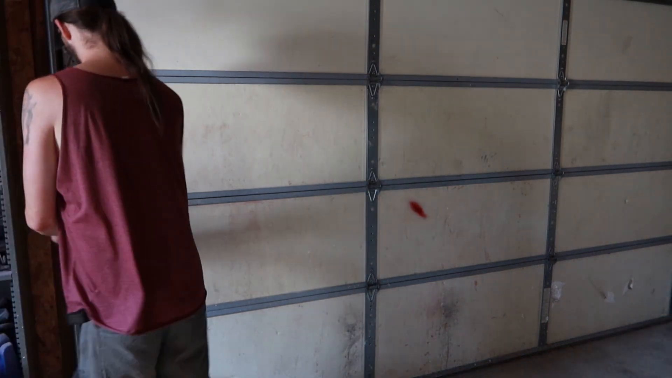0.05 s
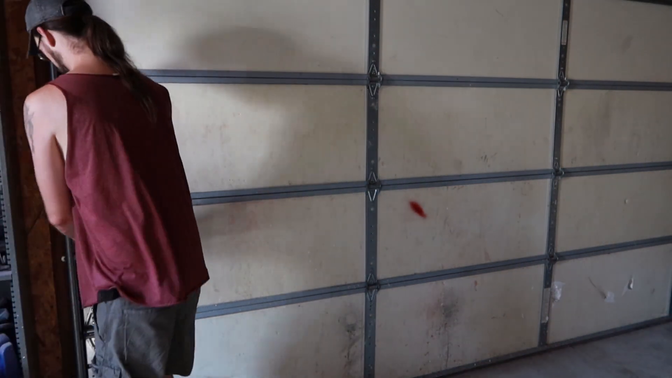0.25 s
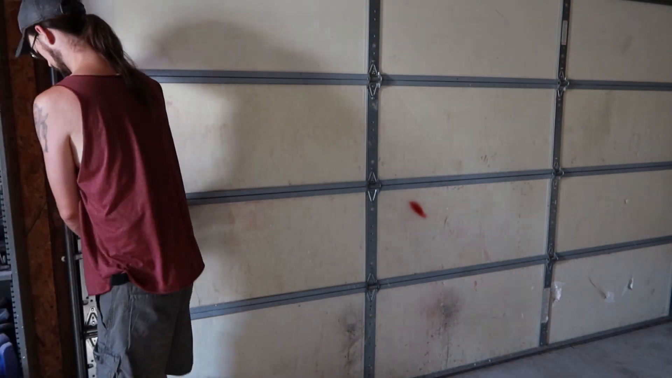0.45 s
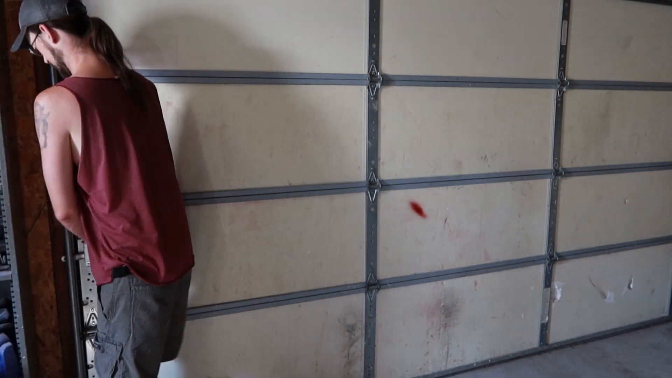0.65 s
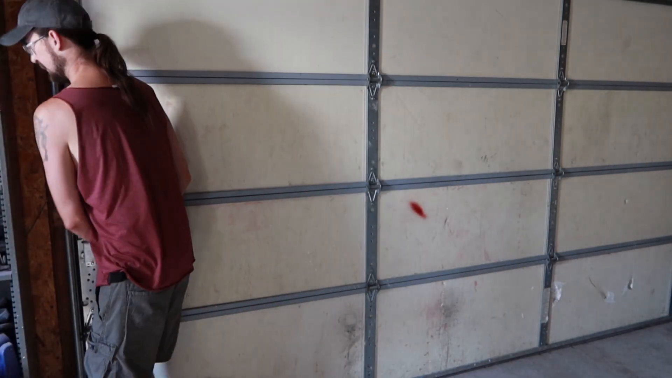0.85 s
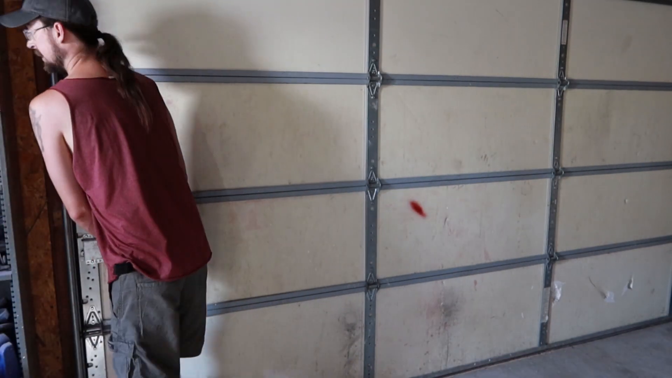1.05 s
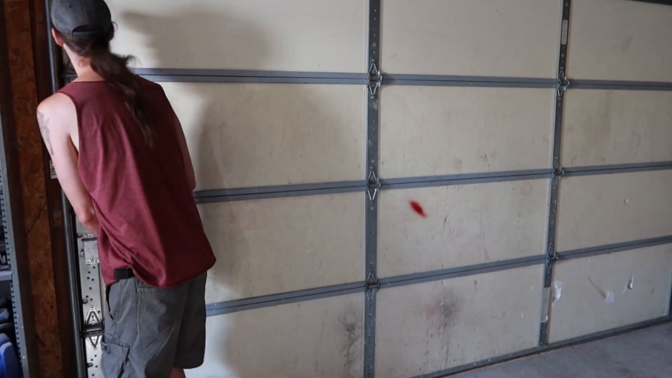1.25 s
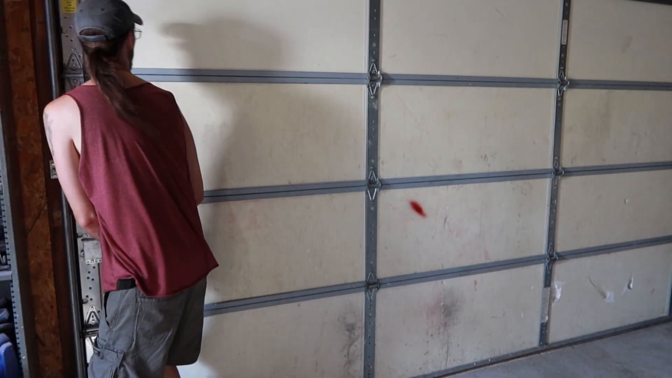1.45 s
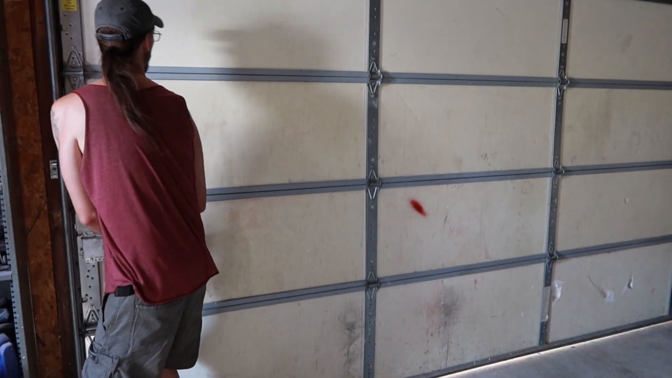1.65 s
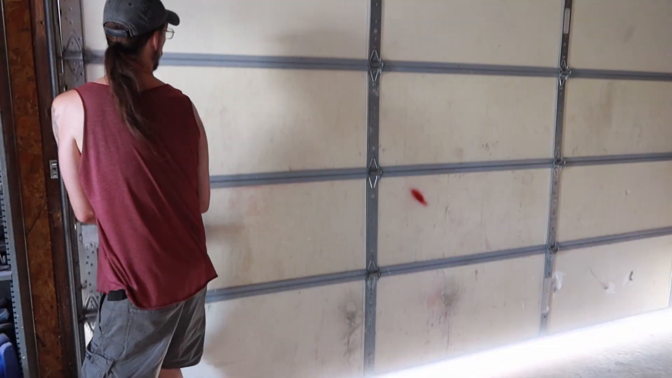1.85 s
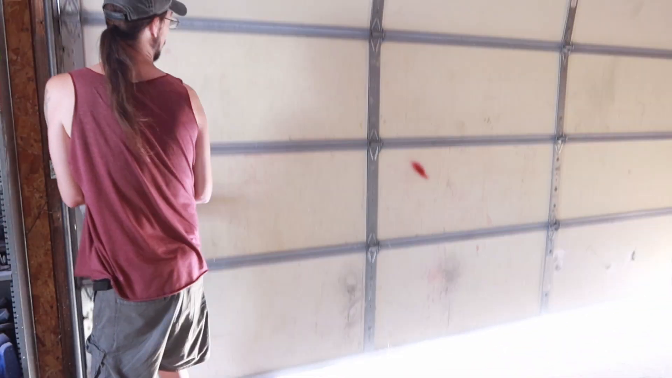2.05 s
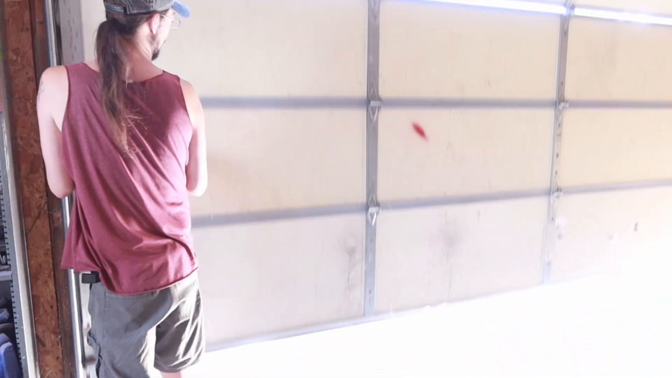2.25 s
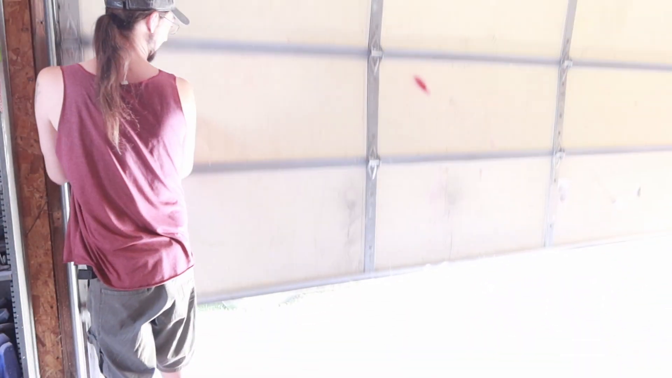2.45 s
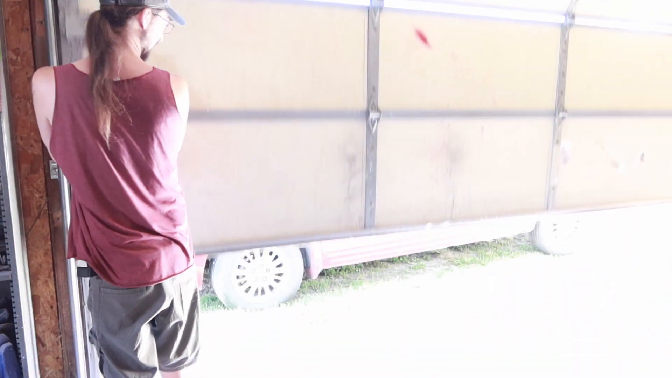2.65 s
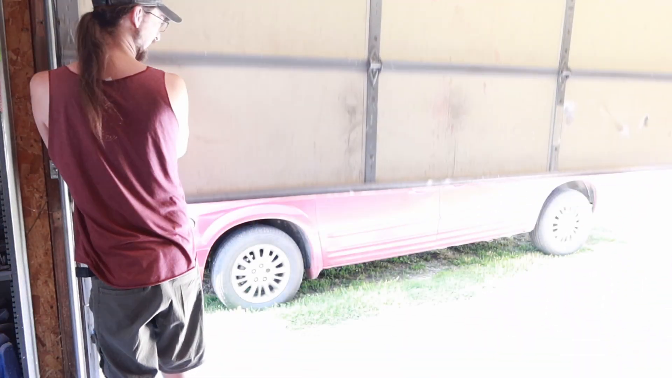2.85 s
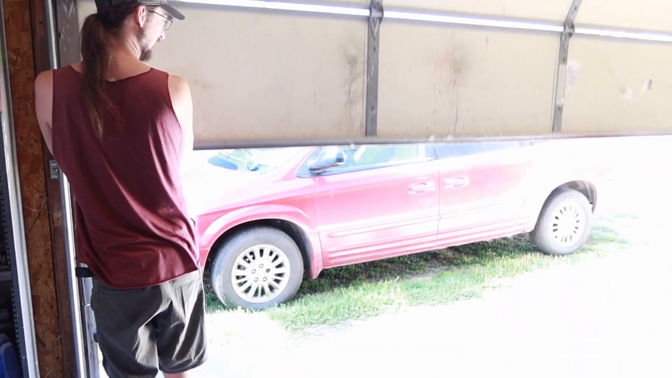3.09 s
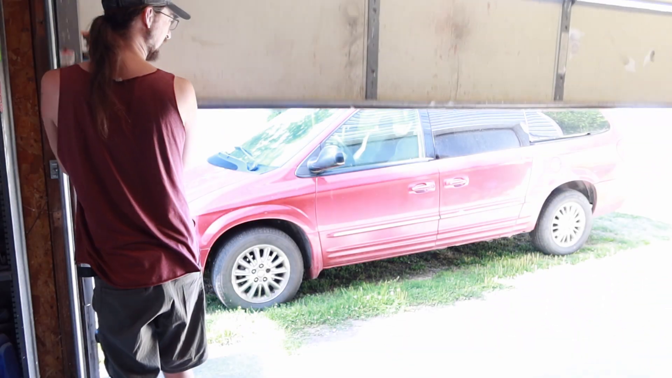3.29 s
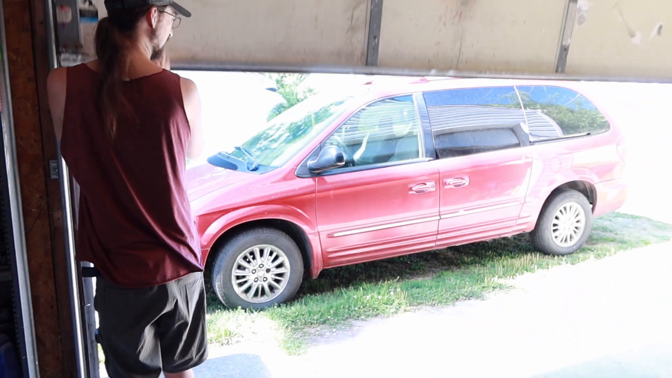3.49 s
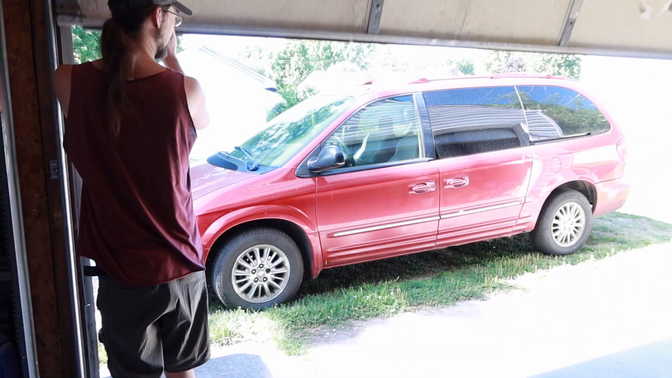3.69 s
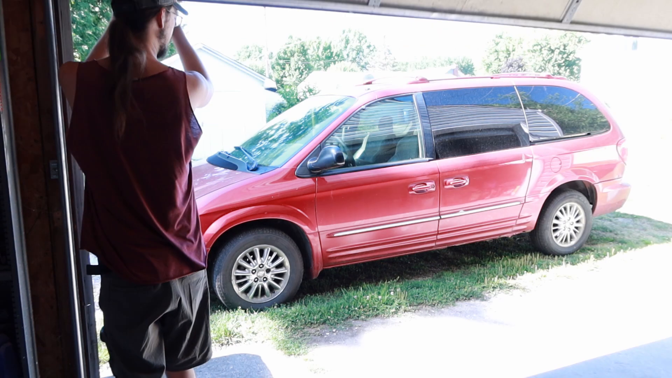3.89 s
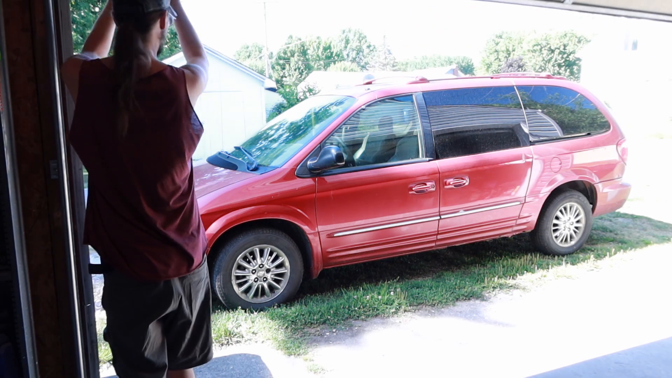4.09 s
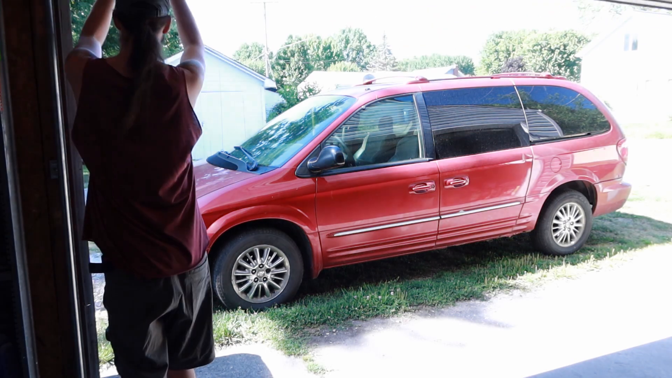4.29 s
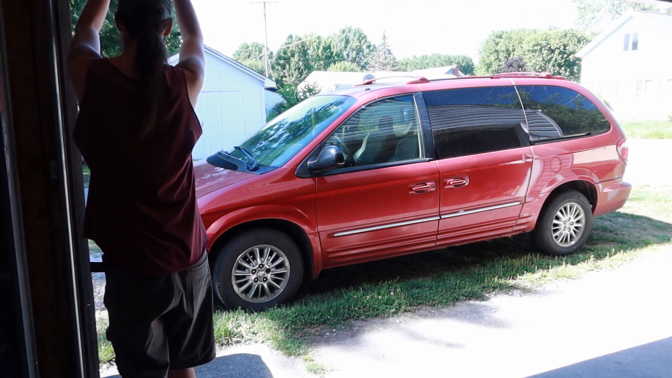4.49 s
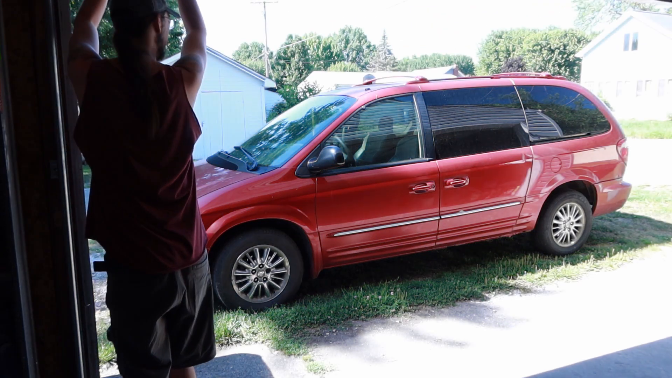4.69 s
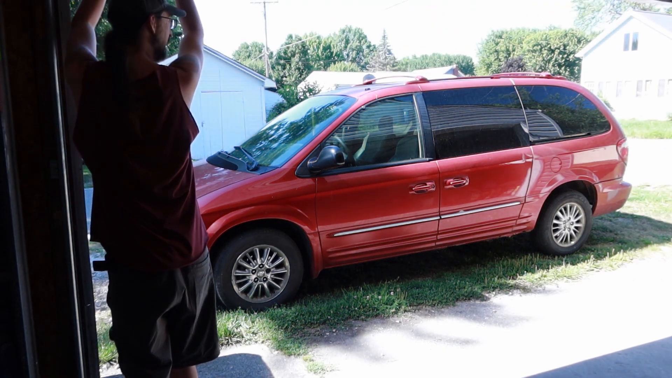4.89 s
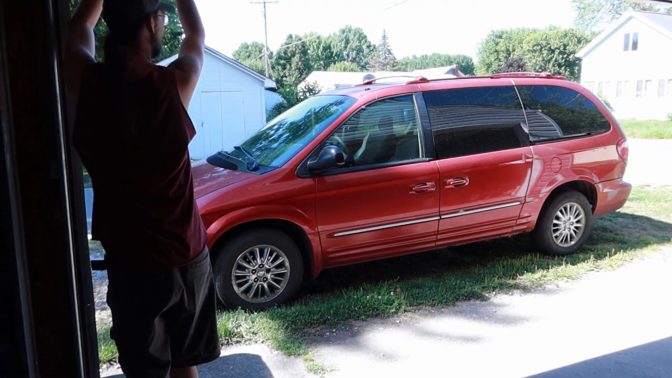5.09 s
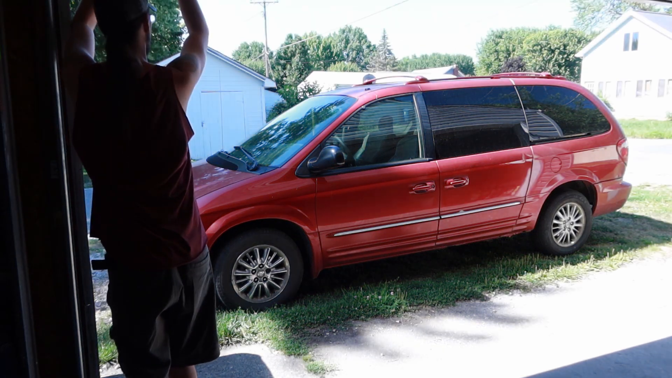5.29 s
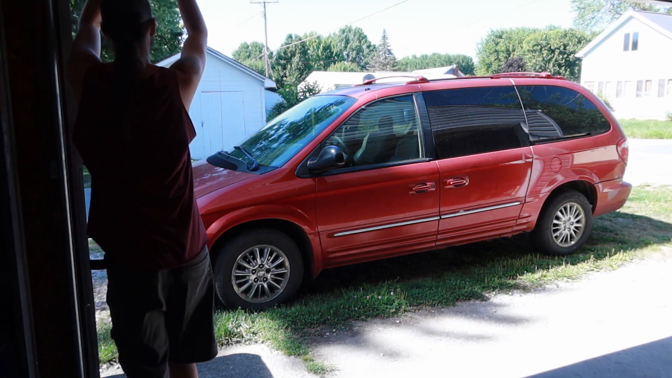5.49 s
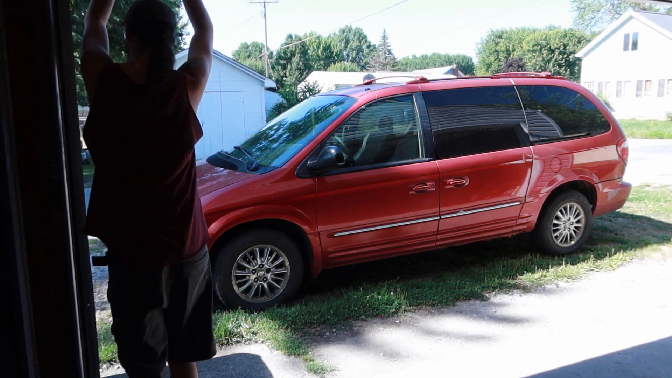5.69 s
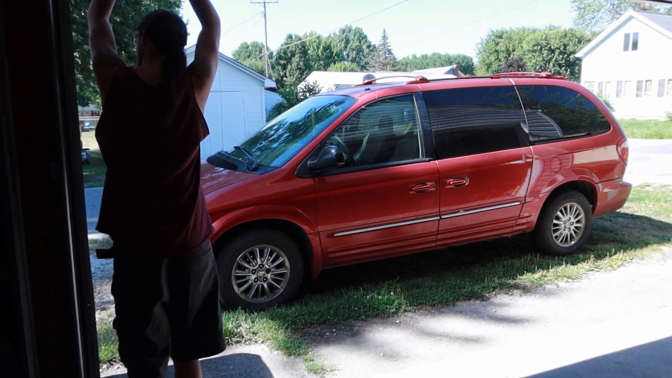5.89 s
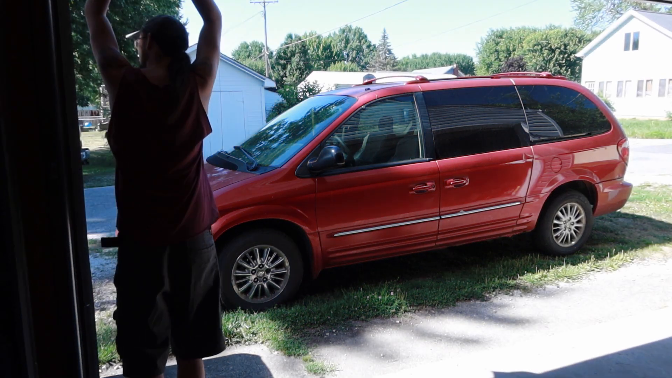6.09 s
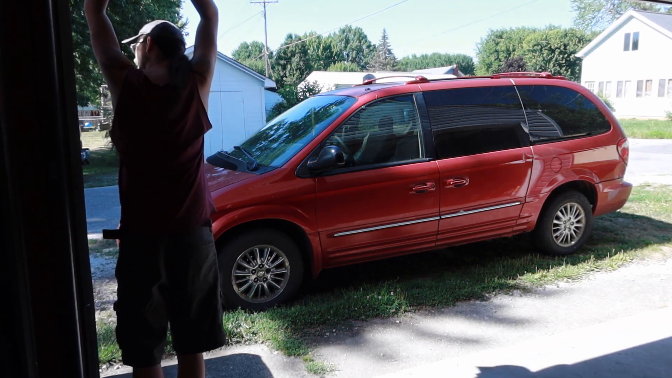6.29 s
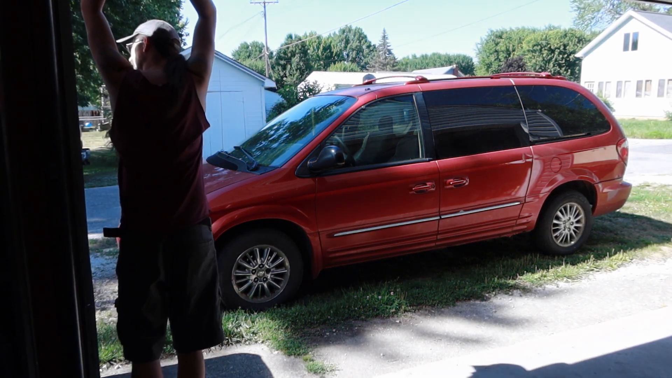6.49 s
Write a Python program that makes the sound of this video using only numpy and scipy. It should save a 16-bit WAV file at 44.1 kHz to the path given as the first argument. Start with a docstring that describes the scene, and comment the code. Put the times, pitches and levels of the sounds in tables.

```python
"""A sectional steel garage door is unlatched, heaved up by hand and rolls along its tracks to rest overhead.
Each contact force excites three resonant bodies: the wide leaf (thud), tracks and hinges (clatter) and
small steel parts (clink). The lock bar rings, hinges creak by stick-slip, and loose rollers rattle, tick
and squeal as decaying modes, noise bursts and gliding tones. The bare garage reverberates; outdoor air
sounds throughout and a bird calls once the door stands open."""
import sys
import numpy as np
from scipy import signal
from scipy.fft import rfft, irfft
from scipy.io import wavfile

SR = 44100
rng = np.random.default_rng(int(sys.argv[2]) if len(sys.argv) > 2 else 0)


def unload_audio(sound):
    """Save the sound as a 16-bit wav file, at the path given as the first command line argument."""
    columns = np.transpose(np.atleast_2d(sound))
    # keep every value between -1 and 1, then stretch to whole-number steps
    steps = np.round(np.clip(columns, -1, 1) * 32767)
    wavfile.write(sys.argv[1], SR, steps.astype(np.int16))


N = 288752
T = np.arange(N) / SR
# scales a blow of energy one: its level is that energy spread over 40 ms
BLOW = np.sqrt(0.04 * SR)


def undb(db):
    """Logarithmic level: decibels become an amplitude gain."""
    return 10 ** (np.asarray(db) / 20)


def unit(x):
    """Energy normalization: the squares sum to one."""
    return x / np.sqrt(np.sum(x ** 2) + 1e-18)


def unit_rms(x):
    """Power normalization: a signal of length N gets an rms of one."""
    return np.sqrt(N) * unit(x)


def at_hz(points, hz):
    """Logarithmic frequency scale: interpolate a table of values over it."""
    table_hz, value = np.transpose(points)
    return np.interp(np.log(hz + 1e-3), np.log(table_hz), value)


def colour(x, points):
    """Linear filtering: weight the spectrum by a table of frequency and dB."""
    gain = undb(at_hz(points, np.fft.rfftfreq(x.shape[-1], 1 / SR)))
    return irfft(rfft(x) * gain, x.shape[-1])


def causal(points, size=4096):
    """Minimum phase: folding the cepstrum gives the most compact causal ring with this spectrum."""
    gain = undb(at_hz(points, np.fft.rfftfreq(size, 1 / SR)))
    cepstrum = irfft(np.log(gain))
    cepstrum[1:size // 2] *= 2
    cepstrum[size // 2 + 1:] = 0
    return irfft(np.exp(rfft(cepstrum)))


def play(force, response):
    """Superposition: convolve a force with a response of one or two channels."""
    return signal.fftconvolve(force[None], response, axes=1)[:, :N]


def add_at(out, start_s, sound):
    """Superposition: add a sound at its start time."""
    i = int(start_s * SR)
    out[..., i:i + sound.shape[-1]] += sound


def walk(rate):
    """Random modulation: join Gaussian knots, rate per second; after 1024 knots the last value holds."""
    knots = rng.standard_normal(1024)
    return np.interp(T * rate, np.arange(len(knots)), knots)


def progress_of(start_s, length_s):
    """Event time: a ramp from 0 to 1 over the event, constant outside it."""
    return np.clip((T - start_s) / length_s, 0, 1)


def drag_swell(start_s, length_s):
    """Drag envelope: the root of a half sine, steep at both ends."""
    return np.sqrt(np.abs(np.sin(np.pi * progress_of(start_s, length_s))))


def contacts(rate, scatter_db):
    """Shot noise: sparse random impacts of either sign and uneven size, rms one; rate per second."""
    chance, size, sign = rng.random(N), rng.standard_normal(N), rng.choice([-1, 1], N)
    return unit_rms((chance < rate / SR) * sign * undb(scatter_db * np.clip(size, -2, 2)))


def by_hardness(soft_hard_db, hardness):
    """Contact stiffness: interpolate in dB between a soft and a hard contact."""
    return undb(np.interp(hardness, (0, 1), soft_hard_db))


def ring(modes):
    """Modal synthesis: sum decaying sines with random signs, total energy one, over one second."""
    t, total = T[:SR], 0
    for hz, db, t60_s in modes:
        tone = unit(np.sin(2 * np.pi * hz * t) * undb(-60 * t / t60_s))
        total = total + undb(db) * rng.choice([-1, 1]) * tone
    return unit(total)


def spread(mid, other, width):
    """Mid-side stereo: a diffuse part enters the two ports with opposite sign, its level set by frequency."""
    return mid + np.array([[1], [-1]]) * colour(other, width)


# reverberation time of the garage: hz [Hz], t60_s [s]
GARAGE_T60 = [(100, 0.6), (300, 0.63), (800, 0.65), (2000, 0.54), (5000, 0.52), (9000, 0.44),
              (15000, 0.042)]
# decorrelation of reflected sound between the ports: hz [Hz], side_db [dB]
PORT_WIDTH = [(60, -99), (200, -76), (420, -25), (700, -36), (1000, -31), (1500, -18), (2300, -14.5),
              (4500, -7.5), (8000, -4.5), (15000, -23.5)]


def garage():
    """Diffuse reverberation: one second of noise in which each frequency band decays at its own rate."""
    hz, s, cells = signal.stft(rng.standard_normal((2, SR)), SR, nperseg=256)
    fade = undb(-60 * s / at_hz(GARAGE_T60, hz)[:, None])
    mid, other = signal.istft(cells * fade, SR)[1][:, :SR]
    return spread(unit(mid), unit(other), PORT_WIDTH)


def shake(force, points, modes, crack_t60, crack_db, modes_db, direct_db=-11, count=6):
    """Structural response: the contact wanders between places, each with its own crack, modes and echoes."""
    stay = SR // 50  # samples at one place
    place = np.repeat(rng.integers(count, size=N // stay + 1), stay)[:N]
    body, out = causal(points)[None], 0
    direct = undb(direct_db) * signal.unit_impulse(SR)
    for k in range(count):
        crack = unit(rng.standard_normal(SR) * undb(-60 * T[:SR] / crack_t60))
        source = direct + undb(crack_db) * crack + garage()
        dense = signal.fftconvolve(source, body, axes=1)[:, :SR]
        response = np.sqrt(2) * unit(dense) + undb(modes_db) * ring(modes)
        out = out + play(force * (place == k), response)
    return out


# spectrum of the outdoor air: hz [Hz], density_db [dB per Hz]
AIR_COLOUR = [(20, -23), (70, -14), (160, -20), (400, -13), (1500, -23.5), (4000, -28), (7000, -34),
              (10000, -41.5), (15000, -65)]
# outdoor air reaches the ports from all around: hz [Hz], side_db [dB]
AIR_WIDTH = [(50, -23), (110, -8), (200, 1), (700, -2), (2000, 0), (6000, -7), (15000, 6)]


def outdoor_air(air_db=-56):
    """Broadband ambient noise: coloured random pressure whose level drifts slowly."""
    mid, other = (unit_rms(colour(rng.standard_normal(N), AIR_COLOUR)) for _ in range(2))
    return spread(mid, other, AIR_WIDTH) * undb(air_db + 2 * walk(1.6))


STRAIN_PEAK_S, STRAIN_DB, STRAIN_RISE_DB_PER_S, STRAIN_FADE_DB_PER_S = 2.77, -40, 5.5, 3


def strain():
    """Slow loading: the strain gain grows exponentially up to its peak in the lift, then dies away."""
    rise = STRAIN_RISE_DB_PER_S * (STRAIN_PEAK_S - T)
    fade = STRAIN_FADE_DB_PER_S * (T - STRAIN_PEAK_S)
    return undb(STRAIN_DB - np.maximum(rise, fade))


# dense resonances of the flexing door, its panels, the tracks and the small parts:
# hz [Hz], density_db [dB per Hz]
FLEX_COLOUR = [(15, -33), (30, -1), (48, 2), (62, -2.5), (80, 2.5), (105, -6), (135, 3.5), (180, -7.5),
               (260, -5.5), (350, -10.5), (700, -44)]
PANEL_COLOUR = [(15, -32), (30, -8), (48, -9), (62, -10), (80, -7), (125, -3), (160, -2.5), (240, -2.5),
                (330, -6.5), (700, -29.5)]
TRACK_COLOUR = [(110, -42), (200, -8.5), (290, 0.5), (450, 2.5), (680, 1), (950, 0.5), (1350, 0),
                (2100, -2.5), (2500, -8), (3300, -9.5), (6000, -26.5), (15000, -53)]
STEEL_COLOUR = [(600, -27.5), (1600, 0.5), (2700, 2.5), (3700, 1), (5000, -1.5), (6600, -1), (8200, -8),
                (10000, -7), (14000, -8.5), (16000, -36)]
# clear modes of the whole leaf, its panels, the tracks and the small parts:
# hz [Hz], level_db [dB], t60_s [s]
LEAF_MODES = [(75.9, 1, 1), (90.1, 2, 0.59), (114, -5, 0.23)]
PANEL_MODES = [(73, -7.5, 0.61), (99.5, 2, 0.25), (155.2, 5, 0.96), (190.2, 0, 0.19)]
TRACK_MODES = [(795, 1.5, 1), (1100, -9, 0.96), (1370, -4, 0.5), (1573, 5.5, 0.16), (1760, 4.5, 0.69),
               (2054, -4, 0.77), (2150, 0, 0.5)]
STEEL_MODES = [(2444, 5, 0.6), (2600, 6, 0.41), (2984, 7.5, 0.39), (3950, -1, 0.59), (4370, -8, 0.17),
               (4830, 7, 0.04), (4960, 1, 0.13), (5740, 2, 0.31), (5840, -12, 0.4), (5800, -19, 0.26),
               (5860, -23, 0.22), (6600, 3, 0.5), (6650, 1, 0.3)]
# fine hiss of the roller bearings: hz [Hz], level_db [dB relative to the rolling force on the tracks]
BEARING_HISS = [(3000, -64), (7000, -44), (9000, -12.5), (12000, -6), (14500, 1.5), (16000, -7)]
BOOM_DB = 1  # boom of the leaf modes, relative to the heave


def door():
    """Forced vibration: heaves and strain flex the leaf, rolling drums panels, tracks and small parts."""
    strain_load = strain()
    thuds, clanks, clinks = blows()
    leaf_load, panel_load = heaves()
    rumble, clatter, grit = rolling()

    bearings = colour(play(clatter, garage()), BEARING_HISS)
    # a sudden change of load makes the lowest modes boom
    boom = BLOW * undb(BOOM_DB) * play(np.gradient(leaf_load), ring(LEAF_MODES)[None])

    flex = leaf_load * contacts(rate=1300, scatter_db=2.5)
    flex += strain_load * contacts(rate=430, scatter_db=1.0)
    rumble = rumble + thuds + panel_load * contacts(rate=1500, scatter_db=1.5)
    rumble += strain_load * undb(-4.5) * contacts(rate=280, scatter_db=0.5)
    clatter = clatter + clanks + strain_load * undb(-5.0) * contacts(rate=110, scatter_db=13.5)
    grit = grit + clinks + strain_load * undb(-18.0) * contacts(rate=80, scatter_db=7)

    return (shake(flex, FLEX_COLOUR, LEAF_MODES, crack_t60=0.051, crack_db=1.5, modes_db=-6.5, count=2)
            + shake(rumble, PANEL_COLOUR, PANEL_MODES, crack_t60=0.082, crack_db=-2.5, modes_db=-5.5, count=4)
            + shake(clatter, TRACK_COLOUR, TRACK_MODES, crack_t60=0.042, crack_db=-3.0, modes_db=-14)
            + shake(grit, STEEL_COLOUR, STEEL_MODES, crack_t60=0.069, crack_db=-2.0, modes_db=-12)
            + boom + bearings)


# steel dragging on steel, the latch bar first and the settling door last:
# start_s [s], length_s [s], level_db [dB], hardness [0-1]
SCRAPES = [(0.028, 0.081, -37.5, 0.69), (0.114, .13, -52.5, 1), (0.67, 0.18, -41, 0.38),
           (1.063, 0.084, -20.5, 0.65), (1.155, 0.059, -29.5, 0.56), (1.48, 0.044, -36.5, 0.1),
           (1.701, 0.052, -35, 0.55), (1.835, 0.11, -31.5, 0.42), (1.942, 0.047, -22.5, 0.7),
           (3.21, 0.074, -25, 0.79), (3.329, 0.088, -26, 0.78), (3.612, 0.052, -29.5, 0.66),
           (4.741, 0.085, -32, .05), (5.113, 0.034, -42, 0), (5.234, 0.09, -34.5, 0.66),
           (5.412, 0.11, -39.5, 0.51), (5.659, 0.077, -47.5, 0), (5.82, 0.055, -48.5, .1),
           (6.0, 0.043, -40.5, 0.1)]
# latch, hinge and roller knocks: start_s [s], level_db [dB], hardness [0-1], chatter_ms [ms]
KNOCKS = [(0.42, -26.5, 0.28, 52), (0.573, -43, 0.3, 5.1), (.799, -25.5, 0.3, 28), (.825, -29.5, .7, 22),
          (.851, -19, 0.85, 2.6), (.902, -18, 0.73, 6.1), (0.982, -27, 0.9, 27), (1.426, -36.5, 0.54, 4),
          (1.557, -40, 0.9, 11), (1.642, -31, 0.4, 10), (1.663, -24, 0.38, 4.5), (1.883, -40, 0.83, 6),
          (1.952, -20.5, 0.46, 4), (1.97, -27, 0.1, 4.4), (1.991, -24, 0.2, 4.3), (2.151, -25.5, 0.7, 3),
          (2.296, -20, 0.73, 15), (2.32, -27, 1, 3.8), (2.363, -24, 0.7, 16), (2.4, -33, 0.93, 1.2),
          (2.523, -20, .6, 2.7), (2.547, -21.5, 0.71, 6), (2.566, -27, 0.72, 4.7), (2.604, -32, .4, 3),
          (2.693, -31, .55, 5), (2.779, -24.5, 0.88, 6.5), (2.829, -23.5, 0.82, 14),
          (2.867, -28, 0.89, 7.7), (3.006, -26, 0.84, 10), (3.035, -30, 0.75, 6), (3.068, -27.5, 0.78, 16),
          (3.254, -21, .4, 9.3), (3.283, -30, 0.65, 3.7), (3.32, -29.5, 0.89, 6.1), (3.358, -26, .75, 7.6),
          (3.655, -30, 0.54, 6.6), (3.709, -31, 0.5, 5.5), (3.739, -25.5, 0.5, 7.3),
          (3.834, -25.5, .1, 6.1), (3.865, -33, 0.53, 4.6), (3.932, -25, 0.37, 3), (3.969, -36, 0.28, 5.1),
          (4.043, -30, 0.77, 6.7), (4.104, -27, 0.3, 13), (4.314, -38, 0.88, 12), (4.345, -43, 0.6, 12),
          (4.393, -49, 0.9, 8), (5.025, -41.5, 0.36, 4), (5.068, -39.5, 0, 4.4), (5.109, -36.5, .1, 8),
          (5.235, -30.5, 0.37, 8.1), (5.933, -41.5, 0.36, 5.5), (6.086, -55.5, 0.96, 15)]
# thud and clink relative to the clatter: (dB when soft, dB when hard)
THUD_DB, CLINK_DB = (-12, -16.5), (-24, 8.5)


def blows():
    """Impact and friction: knocks chatter out, scrapes swell and let go; hard contacts clink more."""
    # rows: panels, tracks, small parts
    force, t = np.zeros((3, N + SR)), T[:SR // 4]
    chatter = np.array([contacts(rate=5000, scatter_db=1.5) for _ in force])
    slips = np.array([contacts(rate=900, scatter_db=7.0) for _ in force])

    def shares(hardness):
        """Force division: gains of thud, clatter and clink."""
        return np.array([[by_hardness(THUD_DB, hardness)], [1], [by_hardness(CLINK_DB, hardness)]])

    for start_s, level_db, hardness, chatter_ms in KNOCKS:
        i = int(start_s * SR)
        decay = np.exp(-t * 1000 / chatter_ms)
        bursts = np.array([unit(row[i:i + len(t)] * decay) for row in chatter])
        add_at(force, start_s, BLOW * undb(level_db) * shares(hardness) * bursts)
    for start_s, length_s, level_db, hardness in SCRAPES:
        force[:, :N] += undb(level_db) * shares(hardness) * drag_swell(start_s, length_s) * slips
    return force[:, :N]


# latch and hinges creak under load:
# start_s [s], length_s [s], resonance_hz [Hz], width_hz [Hz], level_db [dB]
CREAKS = [(0.036, 0.035, 820, 160, -42.5), (0.042, 0.08, 2660, 700, -46), (0.546, 0.065, 2180, 60, -48),
          (0.9, 0.016, 2750, 500, -27), (0.948, 0.042, 2460, 300, -28.5), (0.996, 0.034, 2750, 300, -31),
          (1.485, 0.022, 1350, 121, -41), (1.683, .04, 1350, 160, -36), (5.018, 0.023, 548, 110, -34),
          (5.105, 0.017, 2290, 800, -40), (5.109, 0.032, 1370, 350, -37), (5.236, 0.044, 1440, 300, -38.5),
          (5.233, 0.048, 2600, 600, -46), (5.443, 0.028, 1350, 200, -55), (5.93, 0.016, 1520, 700, -38.5),
          (5.931, 0.011, 2720, 700, -38.5), (6.001, 0.031, 1640, 650, -43.5), (6.005, 0.03, 2700, 600, -51)]


def resonance(hz, width_hz):
    """Damped resonance: a short ring, quick to build and to fade, energy one."""
    t = T[:SR // 10]
    return unit(t * np.sin(2 * np.pi * hz * t) * np.exp(-2 * np.pi * width_hz * t))


def creaks(direct_db=-5):
    """Stick-slip friction: a binding joint slips in quick jerks that ring one resonance of the steel."""
    out, slips = np.zeros(N), contacts(rate=900, scatter_db=2)
    for start_s, length_s, resonance_hz, width_hz, level_db in CREAKS:
        jerks = drag_swell(start_s, length_s) * slips
        out += undb(level_db) * signal.oaconvolve(jerks, resonance(resonance_hz, width_hz))[:N]
    return undb(direct_db) * out + play(out, garage())


# the leaf is shoved, lifted and comes to rest:
# peak_s [s], rise_s [s], fade_s [s], level_db [dB], panel_share [0-1]
HEAVES = [(.259, 0.0015, 0.018, -42, 0.1), (0.338, 0.0017, 0.027, -42.5, 0.02),
          (.423, 0.0028, 0.043, -22.5, 0.04), (.91, 0.082, 0.11, -27, 0.98), (1.1, 0.028, 0.043, -25, 0.56),
          (1.192, .03, 0.034, -30, 0), (1.71, 0.047, .08, -38, 0), (1.969, 0.022, 0.0099, -24.5, 0.8),
          (2.24, 0.15, 0.026, -19, 0.93), (2.54, 0.12, 0.14, -25, 0.56), (4.1, 0.054, 0.067, -28, 1),
          (5.11, 0.075, 0.097, -38, 0.53)]


def heaves():
    """Transient loading: each load on leaf and panels builds up and dies exponentially, power shared."""
    leaf, panels = 0, 0
    for peak_s, rise_s, fade_s, level_db, panel_share in HEAVES:
        load = undb(level_db) * np.exp(-np.maximum((peak_s - T) / rise_s, (T - peak_s) / fade_s))
        leaf = leaf + np.sqrt(1 - panel_share) * load
        panels = panels + np.sqrt(panel_share) * load
    return leaf, panels


# modes of the lock bar: hz [Hz], level_db [dB], t60_s [s]
LOCK_MODES = [(387, 7, 0.23), (420, 9, 0.37), (447, 5, 0.37), (520, 1, .2), (552, 10.5, 0.2),
              (616, -7, .26), (763, 6.5, 0.71), (1690, -12, .3), (2300, -12, .25), (2450, -4, .6),
              (2540, -13, 0.6), (2720, -7, .38), (2750, -4, 0.66), (2760, -11, 0.56), (3050, -12, 0.43)]
UNLOCKED_S = 0.93  # from here on the bar is clear of the track
LOCK_DB = (-18, 1.5)  # ring relative to the knock: (dB when soft, dB when hard)
LOCK_DETUNE = 0.025  # scale of the random shift of each mode, as a share of its pitch


def lock_bar():
    """Modal ringing: each knock rings the bar with shifted modes while it is worked out of the track."""
    out = np.zeros(N + SR)
    for start_s, level_db, hardness, _ in KNOCKS:
        if start_s < UNLOCKED_S:
            shifts = 1 + LOCK_DETUNE * rng.uniform(-0.72, 1, len(LOCK_MODES))
            modes = [(hz * shift, db, t60_s) for (hz, db, t60_s), shift in zip(LOCK_MODES, shifts)]
            add_at(out, start_s, BLOW * undb(level_db) * by_hardness(LOCK_DB, hardness) * ring(modes))
    return out[:N]


# dry snaps of the latch, panel joints and small parts: start_s [s], level_db [dB], t60_ms [ms]
CLICKS = [(.851, -19.5, 35), (.902, -22, 100), (1.994, -17.5, 26), (2.321, -19, 34), (2.4, -28, 20),
          (2.524, -31, 14), (2.549, -29, 25), (2.779, -19, 57), (4.045, -45, 11), (5.106, -48.5, 12),
          (5.932, -45.5, 19), (6.085, -53, 18), (6.238, -66, 12)]
# spectrum of a snap: hz [Hz], density_db [dB per Hz]
CLICK_COLOUR = [(300, -27), (1200, -12), (2000, -2), (2800, -1.5), (3600, -8.5), (4800, 2), (6800, -6.5),
                (8500, -7), (15000, -12)]


def clicks(room_db=-5):
    """Impulsive radiation: a snap is a decaying noise burst, heard dry and then from the room."""
    out, t = np.zeros(N + SR), T[:SR // 10]
    for start_s, level_db, t60_ms in CLICKS:
        burst = unit(rng.standard_normal(len(t)) * undb(-60 * t * 1000 / t60_ms))
        add_at(out, start_s, BLOW * undb(level_db) * burst)
    out = signal.oaconvolve(out[:N], unit(causal(CLICK_COLOUR)))[:N]
    return out + undb(room_db) * play(out, garage())


# squeals of dry rollers:
# start_s [s], length_s [s], start_hz [Hz], end_hz [Hz], level_db [dB], roughness [0-1]
SQUEALS = [(1.844, 0.026, 3500, 3540, -36, 0.3), (1.878, 0.015, 6100, 5800, -39, .2),
           (2.521, .014, 5250, 5080, -18, 0.96), (2.543, .014, 4960, 4900, -19, .9),
           (3.487, 0.062, 4830, 4820, -32, .2), (4.133, 0.095, 3908, 3835, -22, 0.2),
           (4.233, 0.0499, 3780, 3620, -32, 0.02)]


def squeals(waver=0.0187, flutter_db=6, octave_db=-19, room_db=-9):
    """Stick-slip oscillation: a dry roller sings a gliding tone; roughness unsteadies pitch and level."""
    out, wobble = np.zeros(N), waver * walk(400)
    grip_db = flutter_db * np.clip(walk(250), -1.5, 1.5)
    for start_s, length_s, start_hz, end_hz, level_db, roughness in SQUEALS:
        progress = progress_of(start_s, length_s)
        hz = (start_hz + (end_hz - start_hz) * progress) * (1 + roughness * wobble)
        phase = 2 * np.pi * np.cumsum(hz) / SR
        tone = np.sin(phase) + undb(octave_db) * np.sin(2 * phase)
        out += undb(level_db + roughness * grip_db) * np.sin(np.pi * progress) * tone
    return out + undb(room_db) * play(out, garage())


# travel of the door, jerked up, carried on by its springs, braked overhead:
# time_s [s], speed [share of top speed]
SPEED = [(1.93, .3), (1.955, 1), (2.55, 0.99), (3.1, 0.61), (3.6, 0.44), (4.15, 0.33), (4.5, 0.22),
         (4.87, 0), (4.89, 0)]


def pace():
    """Kinematics: the door's speed as a share of its top speed."""
    return np.maximum(np.interp(T, *np.transpose(SPEED), left=0, right=0), 0)


def drive(full_db, slope_db):
    """Power law of speed: gain from dB at full speed and dB lost at a tenth of that speed."""
    return undb(full_db) * pace() ** (slope_db / 20)


# rolling force on panels, tracks, small parts: (dB at full speed, dB lost at a tenth of that speed)
RUMBLE_LAW, CLATTER_LAW, GRIT_LAW = (-28.5, 10), (-23.5, 14.8), (-24.5, 41)


def rolling(bump_rate=70):
    """Rolling contact: force follows speed and bumps; the heavy panels feel half the bumps in dB."""
    bumps_db = 3 * np.clip(walk(bump_rate), -1.5, 1.5)
    rumble = drive(*RUMBLE_LAW) * undb(bumps_db / 2) * contacts(rate=400, scatter_db=4.5)
    clatter = drive(*CLATTER_LAW) * undb(bumps_db) * contacts(rate=260, scatter_db=3)
    grit = drive(*GRIT_LAW) * undb(bumps_db) * contacts(rate=300, scatter_db=11)
    return rumble, clatter, grit


# modes of a roller wheel: hz [Hz], level_db [dB], t60_s [s]
WHEEL_MODES = [(1107, -10.5, 0.031), (1280, -5.5, 0.055), (1350, -9, 0.052), (1528, -7, 0.063),
               (1964, -10, 0.072), (2050, -17, 0.34)]
WHEEL_TAPS_PER_S = 19  # for each wheel at full speed, before jitter
WHEEL_DETUNE = 0.024  # largest pitch offset of a wheel, as a share
RATTLE_LAW = (-35.5, 7.8)  # (dB at full speed, dB lost at a tenth of that speed)


def roller_rattle(jitter=0.3, scatter_db=2.0, room_db=-2, count=3):
    """Repeated impact: loose wheels tap on their stems, slower as the door slows, each with its own pitch."""
    speed, force, out = pace(), drive(*RATTLE_LAW), 0
    for detune in np.linspace(-WHEEL_DETUNE, WHEEL_DETUNE, count):
        taps_per_s = WHEEL_TAPS_PER_S * np.sqrt(speed) * np.exp(jitter * walk(25))
        turns = np.cumsum(taps_per_s) / SR + rng.random()
        # one tap whenever the count passes a whole number
        taps = np.diff(np.floor(turns), prepend=0) * undb(scatter_db * np.clip(walk(60), -1.5, 1.5))
        taps *= np.sqrt(SR / WHEEL_TAPS_PER_S / count)  # rms near one at full speed, all wheels together
        wheel = ring([(hz * (1 + detune), db, t60_s) for hz, db, t60_s in WHEEL_MODES])
        out = out + signal.oaconvolve(force * taps, wheel)[:N]
    return out + undb(room_db) * play(out, garage())


# the louder bright ticks of rollers and small parts, the last after the door has stopped:
# start_s [s], level_db [dB]
TICKS = [(3.74, -39), (3.834, -39), (3.932, -41), (3.969, -38), (4.213, -41), (4.502, -47), (4.57, -43),
         (4.652, -41), (4.709, -44), (4.766, -50), (5.068, -51), (5.898, -62)]
# spectrum of a tick: hz [Hz], density_db [dB per Hz]
TICK_COLOUR = [(500, -22), (1500, -6), (2800, -3), (4200, -4), (6500, 2), (8200, -7), (11000, -7),
               (15000, -11)]
TICKS_PER_S = 36  # average rate of the smaller ticks while the door moves
TICK_LAW = (-37.5, 13)  # smaller ticks: (dB at full speed, dB lost at a tenth of that speed)


def roller_ticks(t60=0.03, room_db=-5):
    """Energy decay: each tick is a fading burst of bright noise, dry against the rumble."""
    force = drive(*TICK_LAW) * contacts(rate=TICKS_PER_S, scatter_db=2.5)
    for start_s, level_db in TICKS:
        force[int(start_s * SR)] += BLOW * undb(level_db)
    decay = unit(undb(-60 * T[:SR // 10] / t60))
    energy = signal.oaconvolve(force ** 2, decay ** 2)[:N]
    noise = np.sqrt(np.abs(energy)) * rng.standard_normal(N)
    out = signal.oaconvolve(noise, unit(causal(TICK_COLOUR)))[:N]
    return out + undb(room_db) * play(out, garage())


# the hardest knocks of a wheel: start_s [s], level_db [dB]
WHEEL_KNOCKS = [(3.532, -31.5), (3.743, -34), (4.209, -32), (4.411, -40), (4.422, -33.5), (5.07, -42)]


def wheel_knocks(room_db=-6):
    """Free vibration: a wheel drops hard against its stem and rings out above the rattle."""
    out = np.zeros(N + SR)
    for start_s, level_db in WHEEL_KNOCKS:
        add_at(out, start_s, BLOW * undb(level_db) * ring(WHEEL_MODES))
    return out[:N] + undb(room_db) * play(out[:N], garage())


# modes of the bump near the end of the track: hz [Hz], level_db [dB], t60_s [s]
END_BUMP_MODES = [(151.3, -3, 0.62), (231, -3, 0.5), (263.5, -1, 0.32), (316, -3, 0.35), (345, -6.5, 0.25),
                  (492, -8.5, 0.21)]
END_BUMP_S, END_BUMP_DB = 4.598, -25


def end_bump():
    """Modal decay: one hollow, quickly fading ring overhead as the door nears the end of its track."""
    out = np.zeros(N + SR)
    add_at(out, END_BUMP_S, BLOW * undb(END_BUMP_DB) * ring(END_BUMP_MODES))
    return out[:N]


# a bird's slurred notes: start_s [s], length_s [s], start_hz [Hz], end_hz [Hz], level_db [dB]
BIRD_NOTES = [(6.25, 0.069, 3650, 3930, -63), (6.348, 0.086, 4130, 4120, -62), (6.42, .03, 4130, 3870, -59),
              (6.445, 0.018, 3950, 3180, -53)]


def bird(arch_hz=150, waver=0.0087, echo_db=-5):
    """Frequency modulation: each note swells and arches in pitch on its way; the garage echoes it."""
    out, wobble = np.zeros(N), 1 + waver * walk(140)
    for start_s, length_s, start_hz, end_hz, level_db in BIRD_NOTES:
        progress = progress_of(start_s, length_s)
        swell = np.sin(np.pi * progress)
        hz = start_hz + (end_hz - start_hz) * progress + arch_hz * swell
        out += undb(level_db) * swell * np.sin(2 * np.pi * np.cumsum(hz * wobble) / SR)
    return out + undb(echo_db) * play(out, garage())


def scene():
    """Superposition: the door, its lock, hinges and rollers, and the outdoors add linearly."""
    steel = door() + creaks() + lock_bar() + clicks() + end_bump()
    rollers = squeals() + roller_rattle() + roller_ticks() + wheel_knocks()
    return steel + rollers + outdoor_air() + bird()


# phase between the two microphone ports: hz [Hz], left_lead_rad [radians]
PORT_PHASE = [(100, 0), (3200, .12), (6000, .5), (7200, .9), (8000, 2.3), (10000, 2.8), (15000, 2.6)]
# the near track stands a little to the left: hz [Hz], left_minus_right_db [dB]
LEFT_DB = [(120, 0), (1000, .3), (2000, .8), (4000, 1.2), (8000, .3), (12000, .1)]
TOP_HZ = 15600  # upper band limit


def record(dry):
    """Interchannel cues: the ports differ in phase and level; peaks are rounded and the top is cut."""
    hz, sides = np.fft.rfftfreq(N, 1 / SR), np.array([[0.5], [-0.5]])
    phase = np.exp(1j * at_hz(PORT_PHASE, hz) * sides)
    balance = undb(at_hz(LEFT_DB, hz) * sides)
    ports = irfft(rfft(dry) * phase * balance, N)
    rounded = ports / (1 + (ports / 0.8) ** 6) ** (1 / 6)  # soft limit at 0.8
    return signal.sosfilt(signal.ellip(10, 0.2, 80, TOP_HZ, fs=SR, output="sos"), rounded)


dry = scene()
out = record(dry)
unload_audio(out)
```